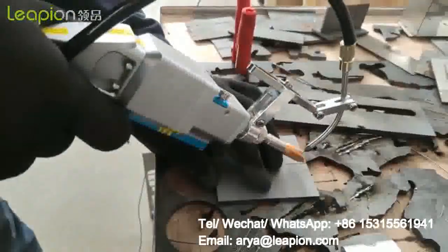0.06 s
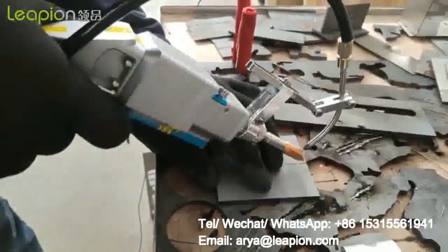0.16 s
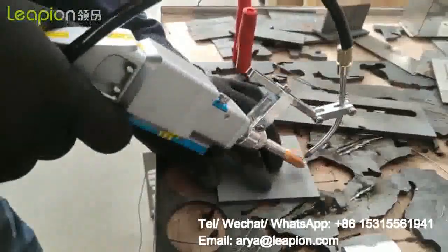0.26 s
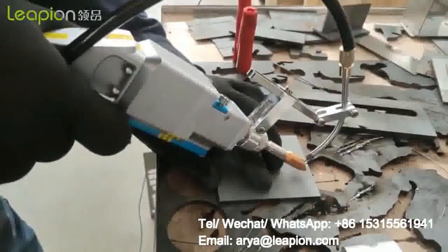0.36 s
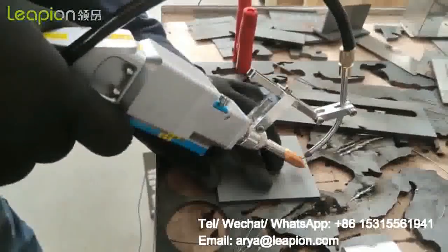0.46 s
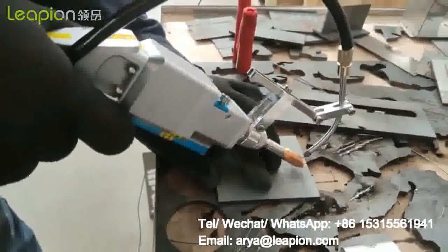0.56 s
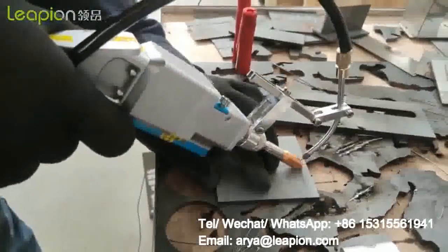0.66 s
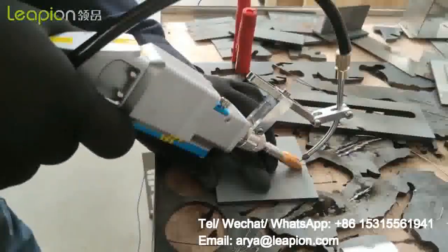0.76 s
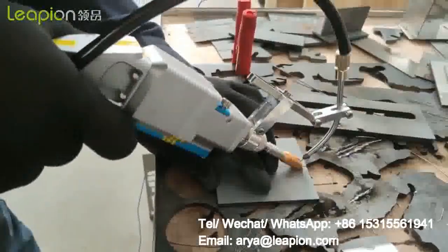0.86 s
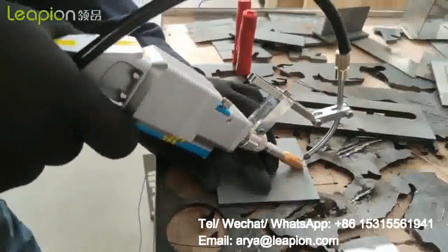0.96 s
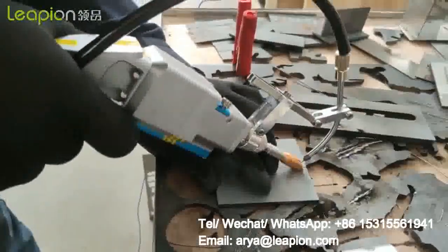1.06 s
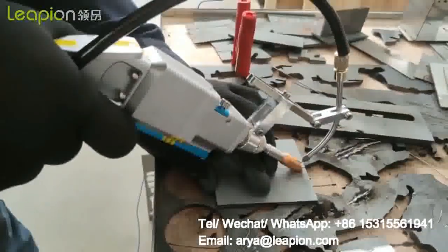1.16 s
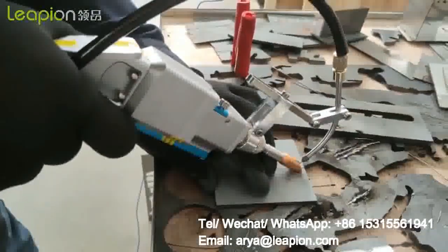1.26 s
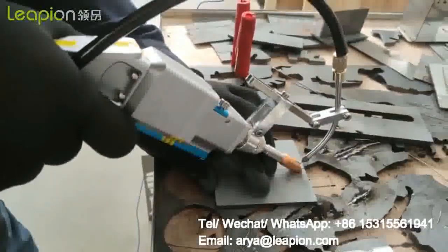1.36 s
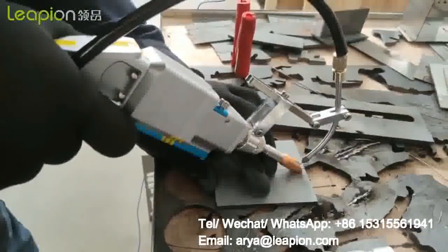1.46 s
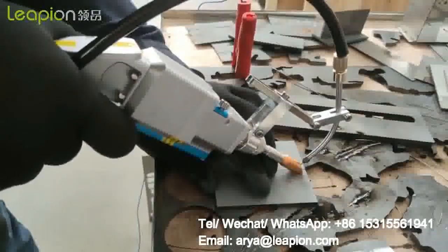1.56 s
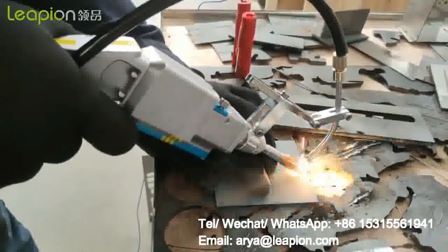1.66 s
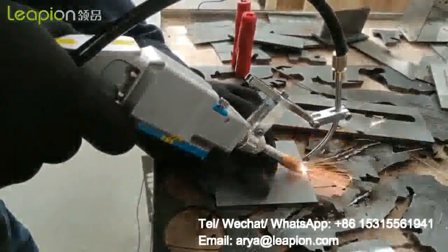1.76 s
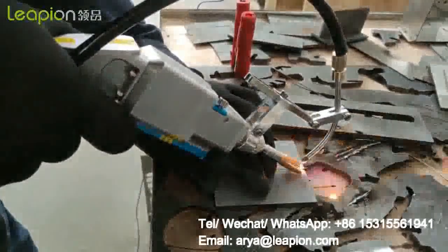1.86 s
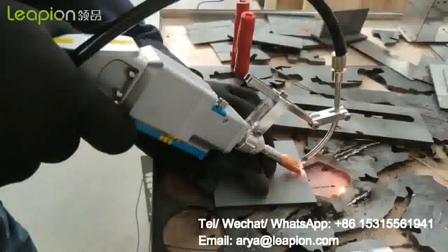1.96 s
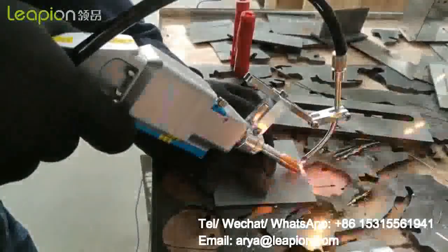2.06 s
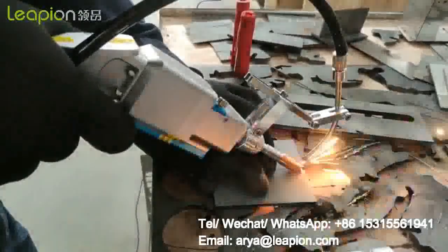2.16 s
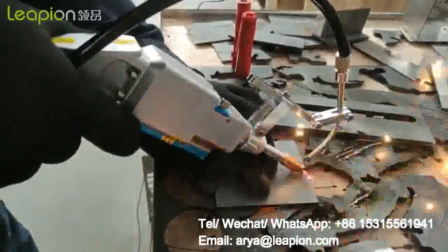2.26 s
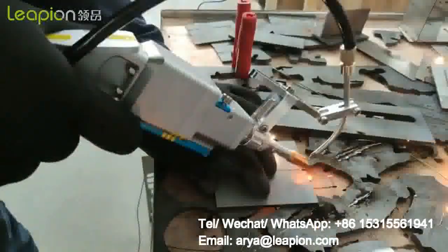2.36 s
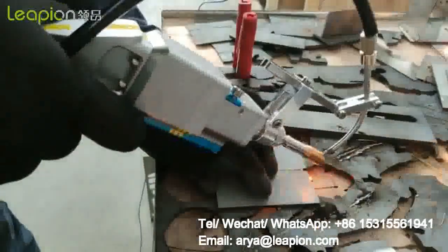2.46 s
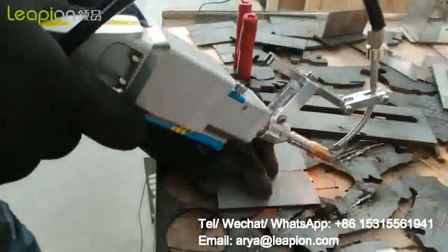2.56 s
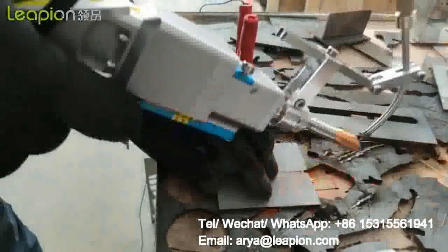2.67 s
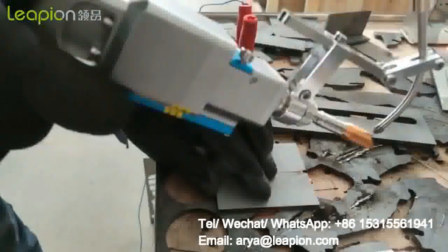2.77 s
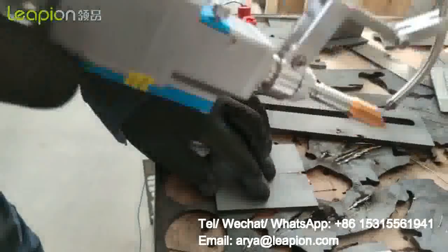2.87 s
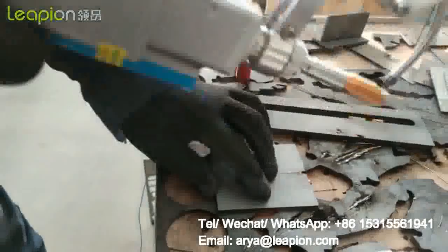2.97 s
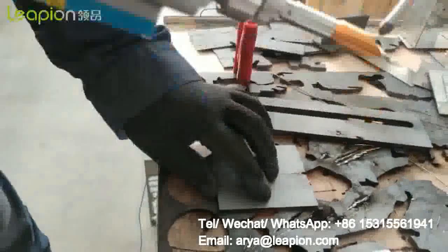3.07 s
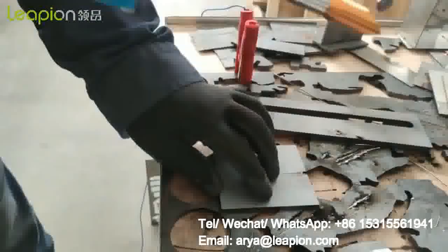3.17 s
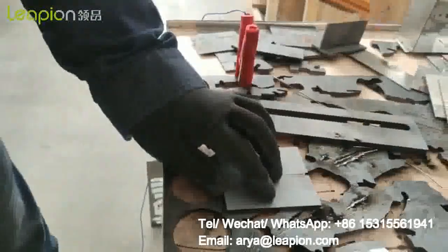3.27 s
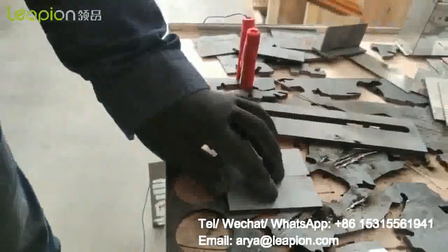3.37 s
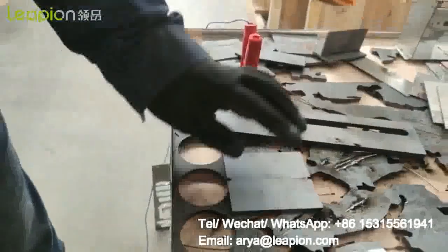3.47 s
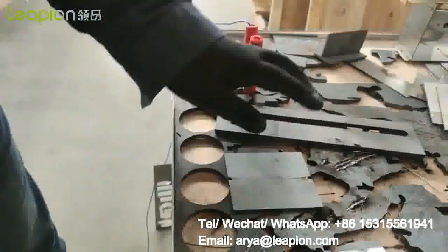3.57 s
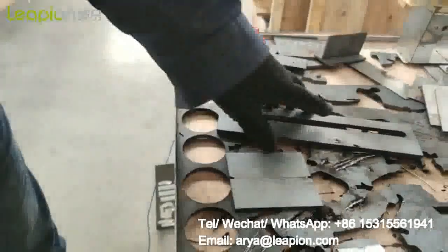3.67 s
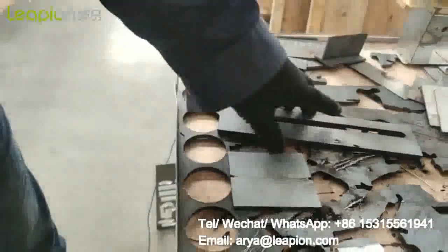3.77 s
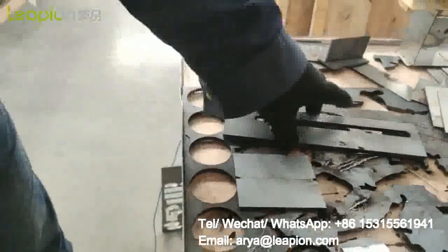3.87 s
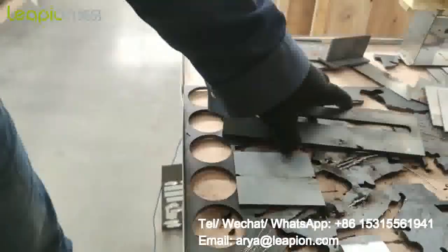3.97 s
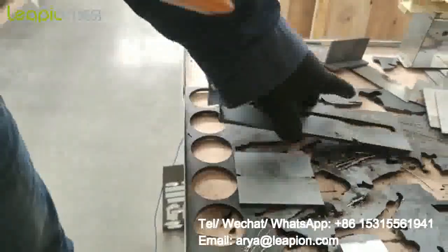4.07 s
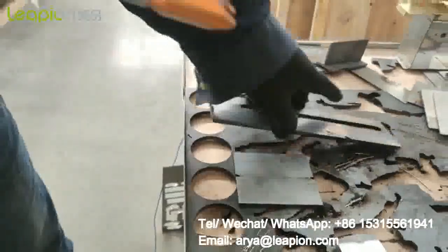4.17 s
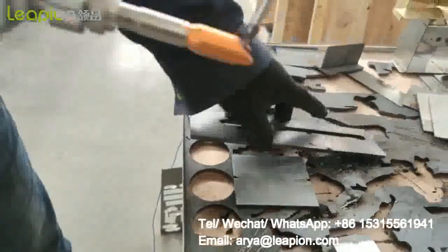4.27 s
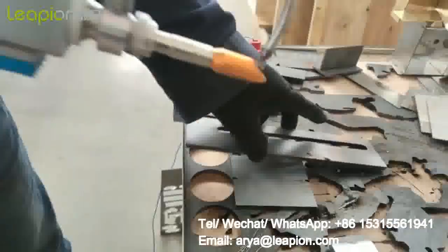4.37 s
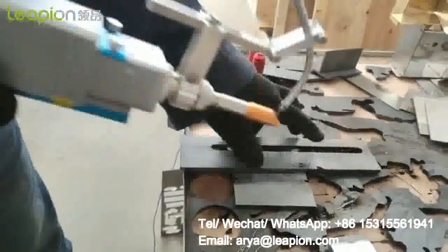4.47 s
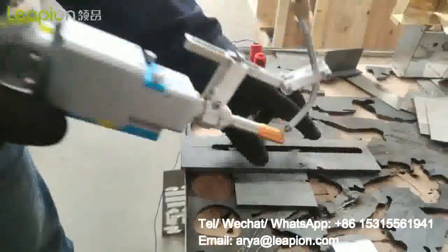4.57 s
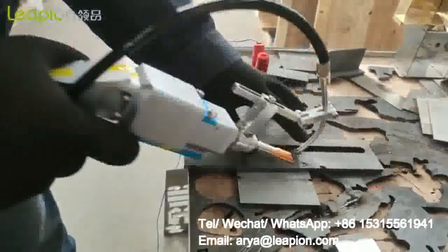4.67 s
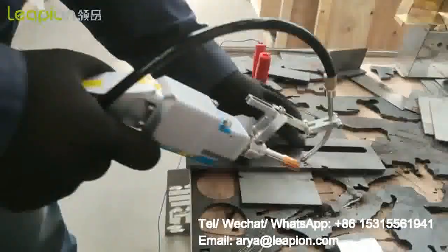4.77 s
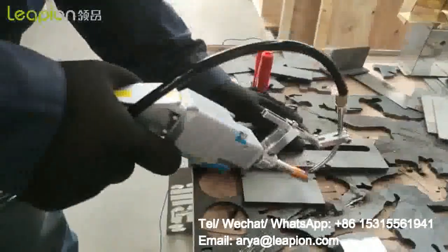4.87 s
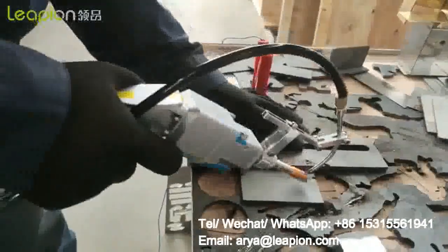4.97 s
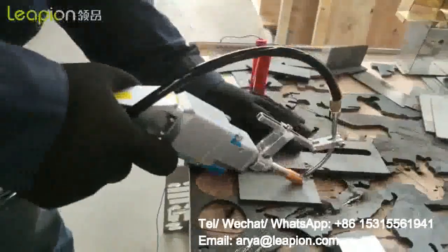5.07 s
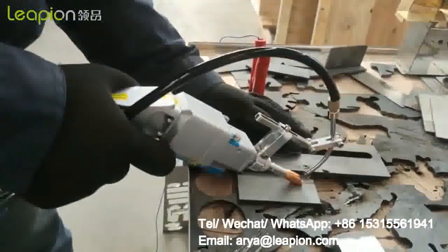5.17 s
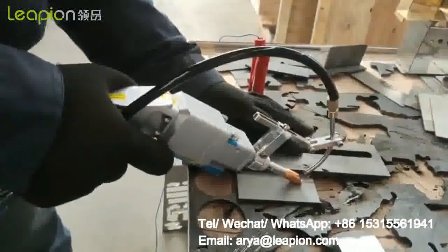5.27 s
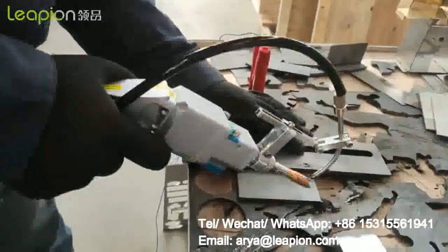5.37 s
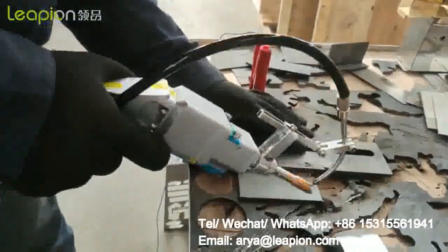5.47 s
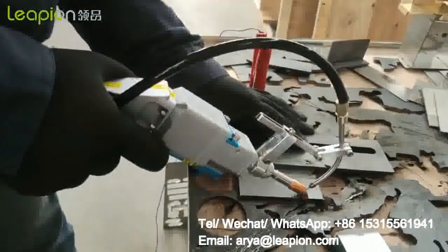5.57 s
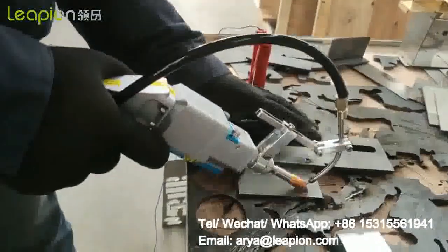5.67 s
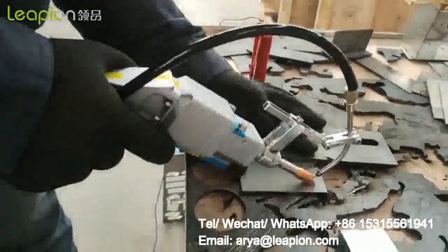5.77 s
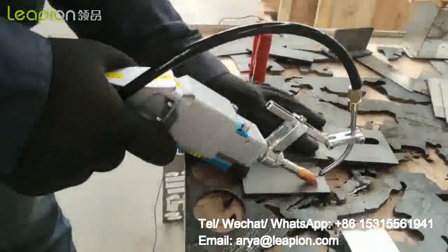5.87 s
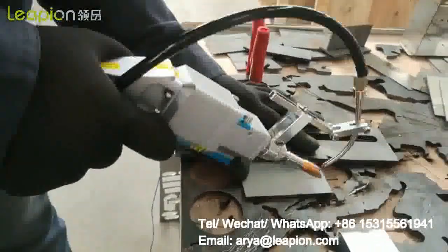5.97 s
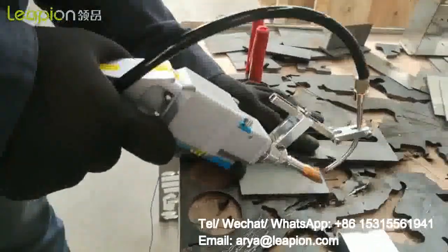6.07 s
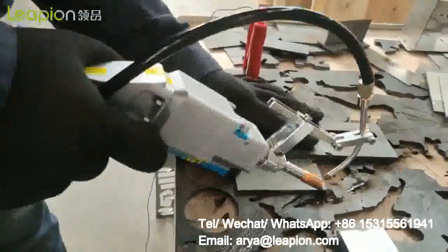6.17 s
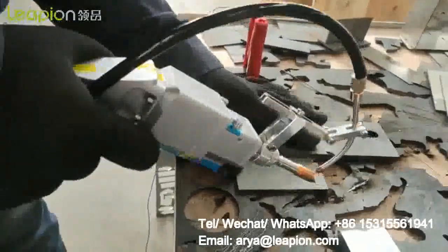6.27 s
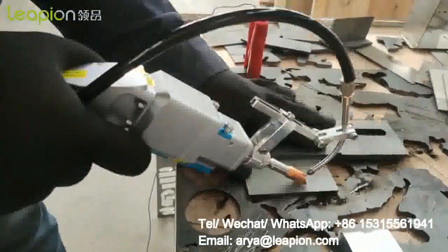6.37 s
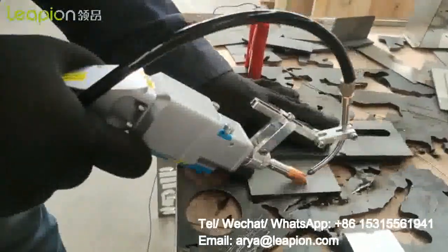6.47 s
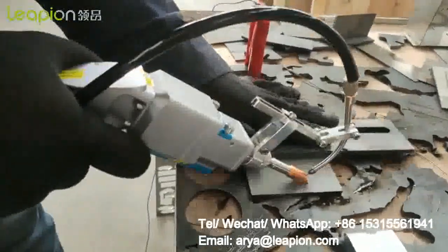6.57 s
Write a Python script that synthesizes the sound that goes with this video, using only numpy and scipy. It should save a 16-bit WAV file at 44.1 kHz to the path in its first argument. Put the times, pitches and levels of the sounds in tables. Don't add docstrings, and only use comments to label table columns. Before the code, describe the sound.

A low, steady fan wash with faint transformer hum fills a workshop throughout, heard by a nearby stereo phone. A barely noticeable tick comes near 0.5 s. At 1.7 s a handheld welder bites steel with a rapid string of sharp crackles and pops, swelling by 1.85 s into a harsh, bright, uneven gas hiss over a low roar, with extra spits near 1.9 and 2.1 s. It cuts off around 2.35 s with a short room tail. A faint tick and soft scrape follow. From 3.7 s steel offcuts are dragged and knocked, with a firm clank at 3.85 s, a cluster of clatters from 4.2 s, and the loudest bang with a bench thud at 4.53 s. Another hard knock lands at 5.1 s. Light scraping continues, with small taps near 5.7 and 5.9 s and a flurry of clinks from 6.35 s to the end at 6.6 s.

```python
import sys
import numpy as np
from scipy import signal
from scipy.fft import irfft
from scipy.io import wavfile
from scipy.ndimage import uniform_filter1d

SR = 44100
rng = np.random.default_rng(int(sys.argv[2]) if len(sys.argv) > 2 else 0)


def transcribe(signal):
    frames = np.atleast_2d(signal).T
    limited = np.clip(frames, -1, 1)
    pcm = np.round(limited * 32767).astype(np.int16)
    wavfile.write(sys.argv[1], SR, pcm)


def amplitude_ratio(level_db):
    exponent = np.asarray(level_db, float) / 20
    return 10 ** exponent


N = 291501
T = np.arange(N) / SR


def evened(x):
    return x / np.sqrt(np.mean(x ** 2) + 1e-20)


def wander(span):
    return evened(uniform_filter1d(rng.standard_normal(N), span))


def read(points, hz, column=1):
    table = np.transpose(points)
    return np.interp(np.log(hz + 1), np.log(table[0] + 1), table[column])


def band(x, lo_hz, hi_hz):
    y = signal.sosfilt(signal.butter(3, [lo_hz, hi_hz], "band", fs=SR, output="sos"), x)
    span = round(SR * min(.007 + 4 / lo_hz, .03))
    return evened(y / abs(uniform_filter1d(y ** 2, span) + 1e-20) ** .4)


def coloured(x, gain):
    log_gain = np.log(gain(abs(np.fft.fftfreq(16384, 1 / SR))) + 1e-5)
    taps = np.fft.ifft(np.exp(np.conj(signal.hilbert(log_gain)))).real[:6000]
    return signal.oaconvolve(x, taps)[:N]


def resonance(hz, centre_hz, width_hz):
    return 1 / np.hypot(1, 2 * (hz - centre_hz) / width_hz)


def grit(per_s, spread_db, smooth):
    size = amplitude_ratio(spread_db * np.minimum(rng.exponential(1, N), 5)) * rng.choice([-1, 1], N)
    return evened(size * (rng.random(N) < per_s / SR)) + smooth * rng.standard_normal(N)


def bursts(rows, t60_s):
    rise_s, crack, crack_s = 0.00061, .55, 0.0046
    power = np.zeros((len(rows[0]) - 1, N))
    for start_s, peak_db, *rel_db in rows:
        span = slice(round(start_s * SR), round(start_s * SR) + SR // 4)
        age_s = np.maximum(T[span] - start_s, 0)
        ring = np.minimum(age_s / rise_s, 1) * amplitude_ratio(-60 * age_s / max(t60_s, .005))
        shape = ring * (1 + crack * np.exp(-age_s / crack_s)) / 1.39
        level_db = peak_db - 6.5 + np.array([0] + rel_db)
        power[:, span] += (amplitude_ratio(level_db)[:, None] * shape) ** 2
    return power


# hz, likeness
PORT_LIKENESS = [(60, -1.2), (120, 0.76), (250, 0.7), (510, 0.58), (1040, 0.16), (2130, -0.17),
                 (4360, 0.099), (8900, 0.15)]


def diffuse(frames, db):
    hz, s = np.fft.rfftfreq(1024, 1 / SR)[:, None], np.arange(frames) * 256 / SR
    a, b, c, d = rng.standard_normal((frames, 513, 4)).T
    same = np.clip(read(PORT_LIKENESS, hz), -1, 1)
    left = a + 1j * b
    right = same * left + np.sqrt(1 - same ** 2) * (c + 1j * d)
    z = np.array([left, right])
    return signal.istft(z * amplitude_ratio(db(hz, s)), nperseg=1024, noverlap=768)[1]


# hz, density_db
FAN_SPECTRUM = [(18, -61), (30, -20.5), (70, -19.5), (86, -14.5), (169, -3), (200, -2), (324, -3),
                (453, -3.5), (604, -4.5), (665, -2.5), (1270, -9.5), (2270, -11.5), (4130, -33),
                (7010, -14), (9350, -34), (12200, -34), (20600, -120)]
# time_s, level_db
FAN_LEVEL = [(0, -44.5), (1.2, -45), (2.6, -43.5), (3.6, -45), (6.61, -45)]
# hz, left_over_right_db
FAN_BALANCE = [(60, -5), (110, 17.5), (180, 5.5), (320, 1), (9000, 0)]
# hz, left_db, right_db
HUM = [(100.7, -54.5, -111), (203.3, -56.5, -63), (298.9, -65.5, -56)]


def shop():
    frames = N // 256 + 5
    patches = uniform_filter1d(rng.standard_normal((frames, 513)).T, 10, 0)
    patches = evened(uniform_filter1d(patches, 12, 1))
    side = np.array([.5, -.5])[:, None, None]

    def wash_db(hz, s):
        return read(FAN_SPECTRUM, hz) + side * read(FAN_BALANCE, hz) + 1.01 * patches
    wash = diffuse(frames, wash_db)[:, :N]
    hum = np.zeros((2, N))
    for hz, left_db, right_db in HUM:
        tone = np.sin(2 * np.pi * hz * T + 6 * rng.random()) * amplitude_ratio(2.0 * wander(3000))
        hum += amplitude_ratio([[left_db], [right_db]]) * tone
    return amplitude_ratio(np.interp(T, *np.transpose(FAN_LEVEL))) * evened(wash) + np.sqrt(2) * hum


# start_s, level_db
THUDS = [
    (3.858, -37),
    (4.287, -41),
    (4.537, -20.5),
    (5.096, -27),
    (5.937, -42),
    (6.501, -47),
]


def thuds():
    rise_s = 0.005
    out, u = np.zeros(N), np.arange(4000) / SR / rise_s
    for start_s, level_db in THUDS:
        out[round(start_s * SR):][:4000] += amplitude_ratio(level_db) * (u * np.exp(-u) - u / 9 * np.exp(-u / 3))
    return out


# start_s, pressed_s, edge_db, plate_rel_db, bench_rel_db
DRAGS = [(3.229, 0.18, -56.5, -2, 12), (3.709, .76, -61.5, 12, 18), (3.781, 0.12, -49, 8.5, 9),
         (3.931, 0.036, -42, 6, 10.5), (4.109, 0.024, -46.5, 3, 7), (4.222, 0.16, -39, 0.5, -2),
         (4.458, 0.086, -57.5, 8, 13), (4.532, 0.076, -23, -1, -2), (4.622, 0.22, -50.5, 7.5, 8.5),
         (4.8, 1.9, -62, 10.5, 15.5), (5.082, 0.038, -33, -3, -5), (5.748, 0.026, -52, 6, 10),
         (5.94, 0.081, -50.5, 4.5, 9.5), (6.338, 0.16, -50.5, 3.5, 13), (6.383, 0.021, -39.5, 5, 9.5),
         (6.413, .04, -42, 6, 15.5), (6.456, 0.036, -31.5, 3, 2), (6.519, .1, -61, -3.5, 14)]


def drags():
    rise_s, fall_db_per_s = 0.015, 252
    power = np.zeros((3, N))
    for start_s, pressed_s, level_db, *rel_db in DRAGS:
        span = slice(round(start_s * SR), round((start_s + pressed_s) * SR) + SR // 3)
        age_s = np.maximum(T[span] - start_s, 0)
        shape = np.minimum(age_s / rise_s, 1) * amplitude_ratio(-fall_db_per_s * np.maximum(age_s - pressed_s, 0))
        power[:, span] += (amplitude_ratio(level_db + np.array([0] + rel_db))[:, None] * shape) ** 2
    return power


# start_s, edge_peak_db, plate_rel_db, bench_rel_db
KNOCKS = [(0.465, -42.5, -17, 5.5), (2.7204, -41, -11, 7), (3.7074, -40, 11, 18.5), (3.7494, -43.5, 6, -26),
          (3.8574, -19, 2, 0.5), (3.9374, -35, 2, 10.5), (4.213, -22, 5.5, -4), (4.281, -22.5, -7, 0),
          (4.29, -26, -4, 3.5), (4.3594, -24, 2.5, -1), (4.39, -26.5, 5.5, 3.5), (4.5245, -10, -20, -28.5),
          (4.5295, -11, -26, -26), (4.5335, -2, -5, -5.5), (4.537, -6.5, 1, 2.5), (4.5415, -11.5, 2, 6),
          (4.572, -17, 6, -22), (4.6094, -16, -8.5, 2), (5.083, -30, -19, -11.5), (5.0955, -15.5, 5.5, 1),
          (5.1, -6.5, -1.5, -2), (5.5004, -69, -9, 8), (5.672, -35.5, 7, 8.5), (5.937, -39.5, 6, 19.5),
          (6.3574, -40.5, 9.5, 20.5), (6.415, -33.5, 5, 19), (6.4344, -24, 10.5, 12.5),
          (6.447, -29.5, 6, 16), (6.484, -19.5, -3.5, -11)]
# hz, density_db
STEEL_SPECTRUM = [(35, -46), (60, -12.5), (332, 0), (446, -9.5), (529, 0), (975, -5.5), (1150, -2),
                  (2090, 2.5), (3390, -7.5), (3850, -23.5), (4280, -18), (4760, -23), (5180, -18),
                  (7260, -11.5), (9350, -21.5), (12200, -31), (20600, -120)]
# hz, width_hz, level_db
PLATE_MODES = [(336.5, 18, 3.5), (2065, 19, -12), (3555, 59, -7), (4160, 52, -14.5), (4500, 100, 14),
               (5450, 68, -9.5), (5160, 24, -3), (5610, 35, -8.5), (6080, 48, 0.5), (7850, 14, 15),
               (7120, 33, -10.5), (7290, 390, -5.5), (6850, 290, -6.5), (7800, 80, 21.5), (8480, 340, -10),
               (8070, 86, -26.5)]


def steel():
    def gain(hz):
        modes = sum(amplitude_ratio(db / 4 - 6.0) * resonance(hz, f, w) for f, w, db in PLATE_MODES)
        return amplitude_ratio(read(STEEL_SPECTRUM, hz)) * (.5 + modes)
    slips = amplitude_ratio(2.2 * wander(250))
    ring = coloured(grit(per_s=1500.0, spread_db=3.5, smooth=0.61) * slips, gain)
    edge, plate, bench = np.sqrt(drags() + bursts(KNOCKS, t60_s=.07))
    low = band(ring, 130, 1110) + amplitude_ratio(-28) * band(ring, 15, 120)
    return edge * band(ring, 4540, 8500) + plate * band(ring, 1292, 4380) + bench * low


# start_s, jet_peak_db, pool_rel_db
SPUTTERS = [(1.682, -36, -7), (1.688, -22.5, -8.5), (1.693, -13, -2.5), (1.7187, -8.5, -5),
            (1.724, -24, -18), (1.7465, -16.5, -5.5), (1.751, -5.5, -17), (1.767, -20.5, -15),
            (1.771, -9.5, -4.5), (1.878, -7, -4.5), (2.088, -15, -3), (2.226, -40, -29), (2.335, -29, -4),
            (2.352, -16, -7)]


def beam():
    full_s, off_s, jet_db, pool_rel_db = 1.845, 2.355, -23, -6
    build_db_per_s, dying_db_per_s = 112, 297
    build_db = jet_db - build_db_per_s * np.maximum(full_s - T, 0)
    dying_db = -dying_db_per_s * np.maximum(T - off_s, 0)
    pool_db = build_db + pool_rel_db + .7 * dying_db
    return amplitude_ratio([build_db + dying_db, pool_db]) ** 2 * (T > SPUTTERS[0][0])


# hz, density_db
JET_SPECTRUM = [(59, -31), (325, -15.5), (800, -5.5), (1400, -2.5), (1950, -1), (2650, -11), (3500, -11.5),
                (4540, -22), (5390, 1), (7700, 12), (9350, -6), (12200, -30), (20600, -120)]
# hz, width_hz, rel_jet_db
WHISTLES = [(8350, 76, -16), (7200, 110, -54), (2125, 17, -2)]
# start_s, level_db, rise_s
KICKS = [
    (1.7438, 3, 0.000076),
]


def weld():
    def gain(hz):
        whistles = sum(amplitude_ratio(db + 2) * resonance(hz, f, w) for f, w, db in WHISTLES)
        return amplitude_ratio(read(JET_SPECTRUM, hz)) * (1 + whistles)
    flutter = amplitude_ratio(0.98 * wander(300))
    jet = coloured(grit(per_s=3600.0, spread_db=-2.5, smooth=1.92) * flutter, gain)
    high, low = np.sqrt(beam() + bursts(SPUTTERS, t60_s=0.019))
    roar = band(jet, 120, 3700) + amplitude_ratio(-25) * band(jet, 20, 90)
    out = high * band(jet, 4800, 8900) + low * roar
    for start_s, level_db, rise_s in KICKS:
        u = np.arange(400) / SR / rise_s
        push = u * np.exp(-u) - u / 36 * np.exp(-u / 6)
        out[round(start_s * SR):][:400] += amplitude_ratio(level_db) * push
    return out


# hz, level_db, left_lag_rad
DIRECT = [(211, -2, 0.3), (723, -1, 0.3), (1273, -0.5, 2.8), (2324, -1, 5.8), (4360, -3, 12.6),
          (9460, -7, 22)]
# hz, room_db, t60_s
ECHO = [(197, -5.5, 0.19), (870, -3, 0.26), (3230, 0.5, 0.18), (6190, 3.5, 0.13), (8330, 0.5, 0.11)]


def heard(x):
    hz = np.fft.rfftfreq(1024, 1 / SR)
    lag_rad = np.interp(hz, *np.transpose(DIRECT)[::2])
    paths = amplitude_ratio(read(DIRECT, hz)) * np.exp(-1j * lag_rad * np.array([[1], [0]]))
    direct = np.roll(irfft(paths), 64, axis=1)
    out = 0.71 * signal.oaconvolve(x[None], direct, axes=1)[:, 64:N + 64]
    for k in range(3):
        tail = diffuse(50, lambda hz, s: read(ECHO, hz) - 60 * s / read(ECHO, hz, column=2))[:, 60:]
        tail *= 1 + 3 * np.exp(-np.arange(tail.shape[1]) / SR / .003)
        tail = np.pad(tail / np.linalg.norm(tail[0]), [(0, 0), (60, 0)])
        share = np.sqrt(2 / 3) * np.cos(np.pi * (T * 7. + k / 3))
        out += 0.74 * signal.oaconvolve((x * share)[None], tail, axes=1)[:, :N]
    return out


def scene():
    weld_db, steel_db, shop_db = 4.0, 1.5, 1.0
    small_parts = amplitude_ratio(weld_db) * weld() + amplitude_ratio(steel_db) * steel()
    bench = signal.lfilter(*signal.butter(2, 70, "high", fs=SR), small_parts)
    return heard(bench + thuds()) + amplitude_ratio(shop_db) * shop()


# hz, gain_db
TONE = [(2500, -0.5), (3600, 1.5), (4000, 5.5), (4600, 1), (5300, 0), (6500, -2), (7300, 3), (8200, 1.5),
        (9000, 5)]
# hz, masker_over_step_db
RESOLUTION = [(100, 14), (1000, 4), (1800, -2), (3400, 0), (3750, -3), (3900, -14), (4700, -14), (5200, -7),
              (6000, -6), (6600, -8), (7400, -3), (8200, -9), (8800, -9), (9400, -12)]
# time_s, top_hz
REACH = [(0, 9500), (3.68, 9500), (3.72, 8600), (6.61, 8500)]


def thinned(x):
    size, offset = 1024, 725
    fast = uniform_filter1d(uniform_filter1d((x ** 2).mean(0), 250), 250)
    slow = signal.lfilter([.0004], [1, -.9996], fast + 1e-9)
    loud = np.sqrt(uniform_filter1d(np.maximum(fast, 1.8 * slow), 200))
    padded = np.pad(x / loud, [(0, 0), (2 * size - offset, 2 * size)])
    starts = np.arange(padded.shape[1] // size - 1) * size
    n, k = np.arange(2 * size) + .5, np.arange(448) + .5
    hz = k * SR / (2 * size)
    window = np.sin(np.pi * n / (2 * size))[:, None]
    basis = window * np.cos(np.pi / size * np.outer(n + size / 2, k))
    lines = padded[:, starts[:, None] + np.arange(2 * size)] @ basis * amplitude_ratio(read(TONE, hz))
    masker = np.sqrt(uniform_filter1d((lines ** 2).mean(0), 60, axis=1))
    whim = evened(uniform_filter1d(rng.standard_normal((len(starts), 28)), 3, axis=0))
    step = masker * amplitude_ratio(5. * np.repeat(whim, 16, axis=1) - read(RESOLUTION, hz))
    top_hz = np.interp((starts - size) / SR, *np.transpose(REACH))[:, None]
    step *= amplitude_ratio(np.clip((hz - top_hz) / 50, 0, 14))
    lines = np.sign(lines) * np.floor(abs(lines) / step + .4) * step
    frames = lines @ basis.T * 2 / size
    out = np.zeros_like(padded)
    for start, frame in zip(starts, frames.swapaxes(0, 1)):
        out[:, start:start + 2 * size] += frame
    return out[:, 2 * size - offset:][:, :N] * loud


def low_pass(x):
    return signal.sosfilt(signal.butter(12, 9650, fs=SR, output="sos"), x)


def record(dry):
    rounded = .92 * np.tanh(thinned(dry) / .92)
    return low_pass(rounded)


dry = scene()
out = record(dry)
transcribe(out)
```